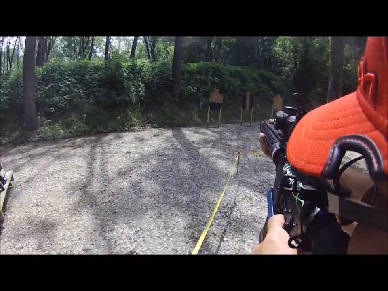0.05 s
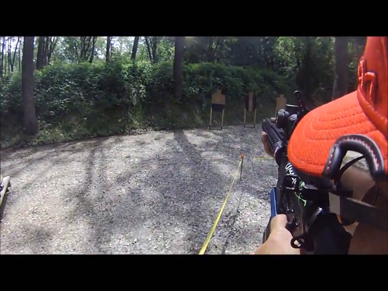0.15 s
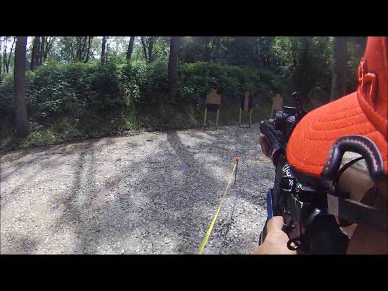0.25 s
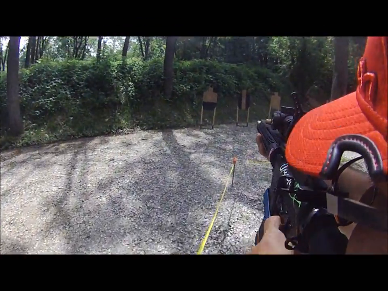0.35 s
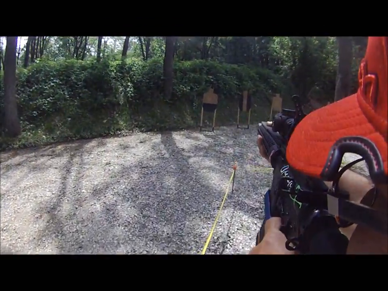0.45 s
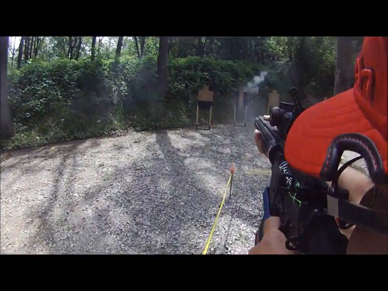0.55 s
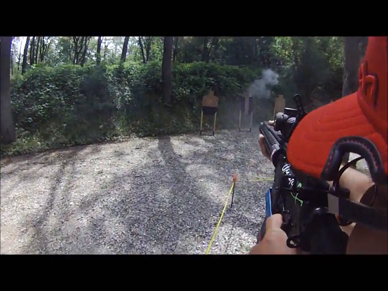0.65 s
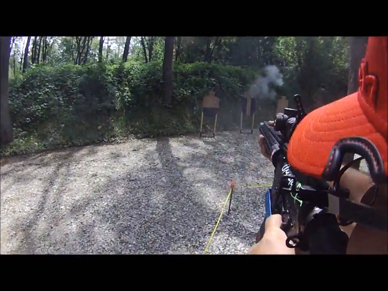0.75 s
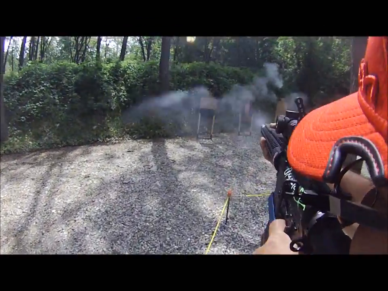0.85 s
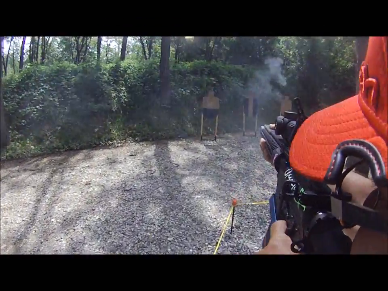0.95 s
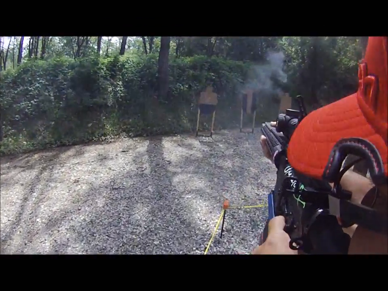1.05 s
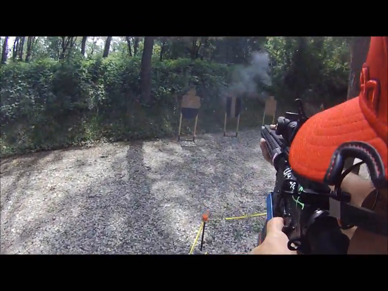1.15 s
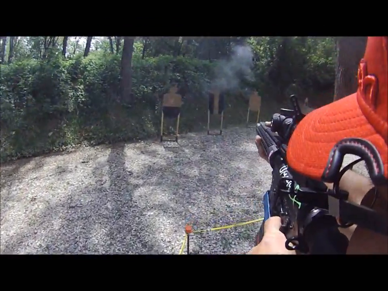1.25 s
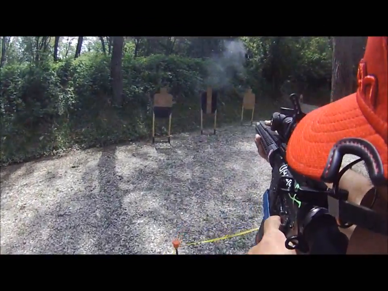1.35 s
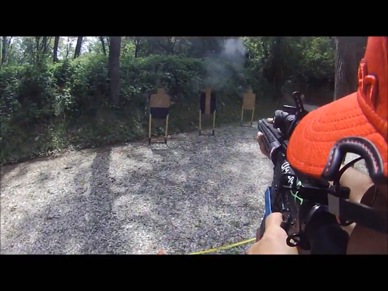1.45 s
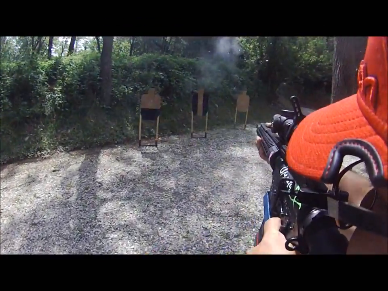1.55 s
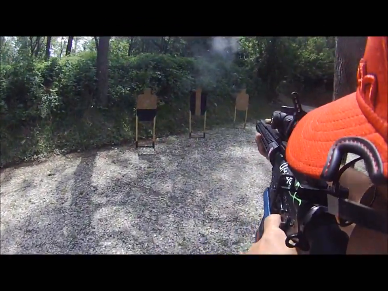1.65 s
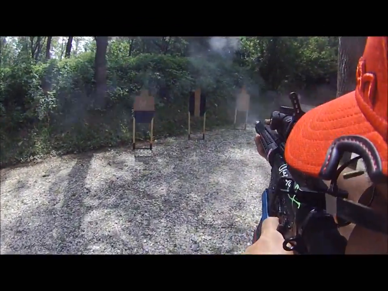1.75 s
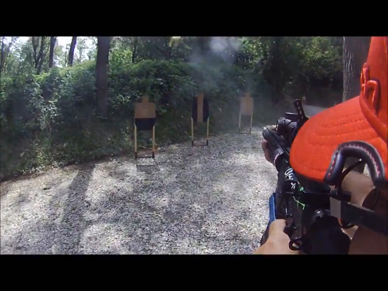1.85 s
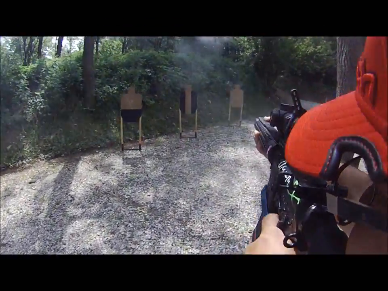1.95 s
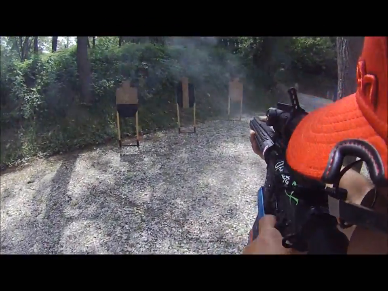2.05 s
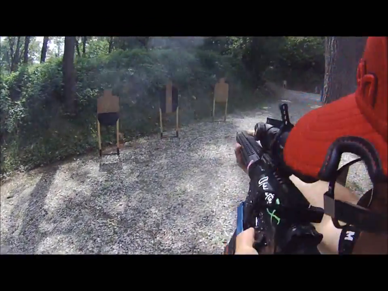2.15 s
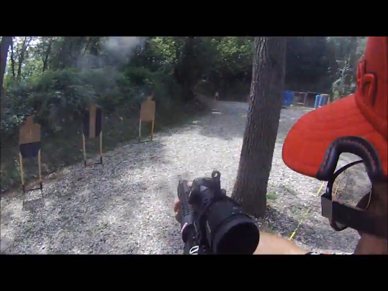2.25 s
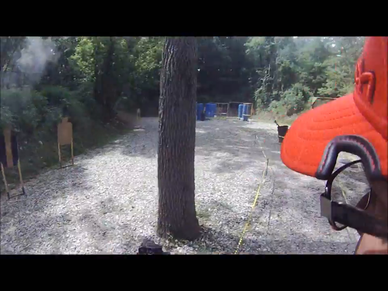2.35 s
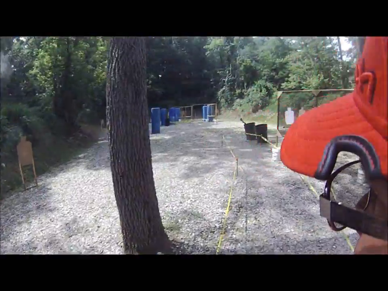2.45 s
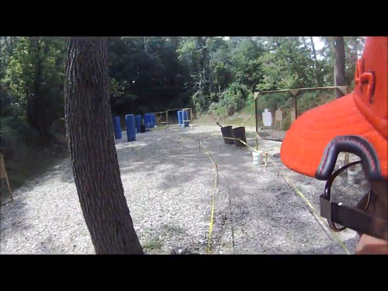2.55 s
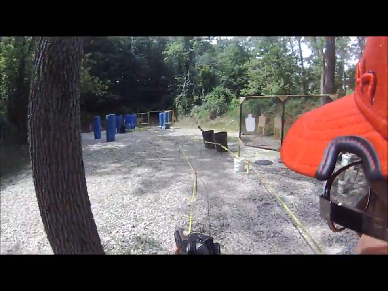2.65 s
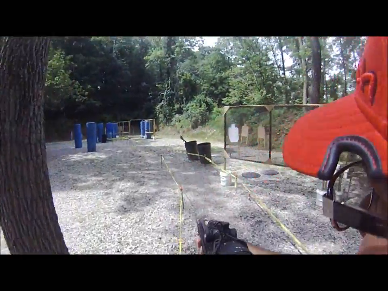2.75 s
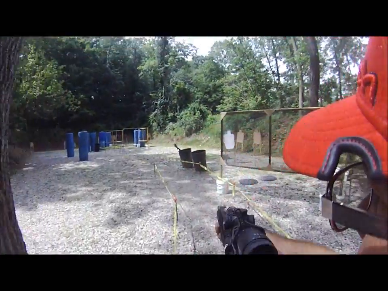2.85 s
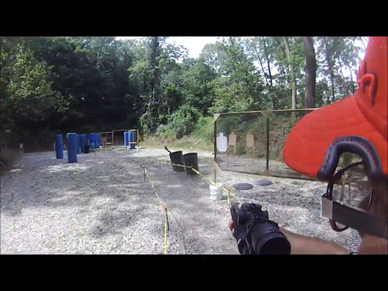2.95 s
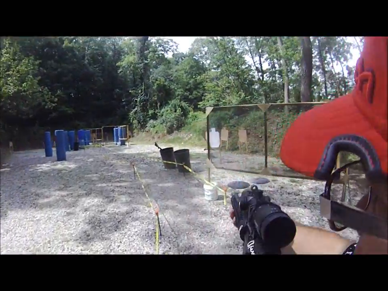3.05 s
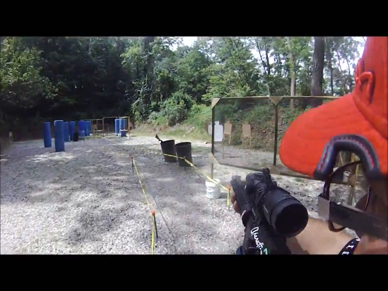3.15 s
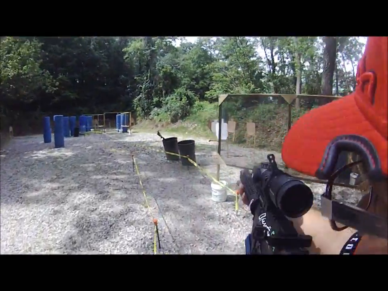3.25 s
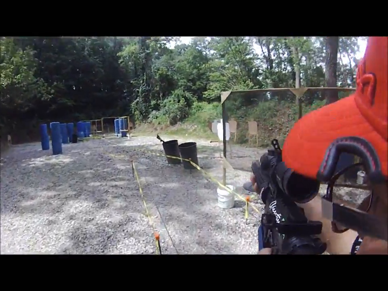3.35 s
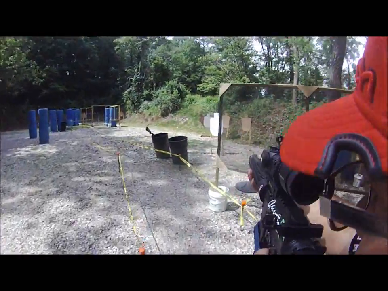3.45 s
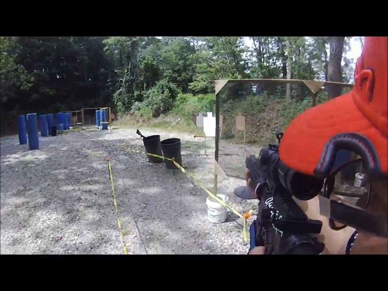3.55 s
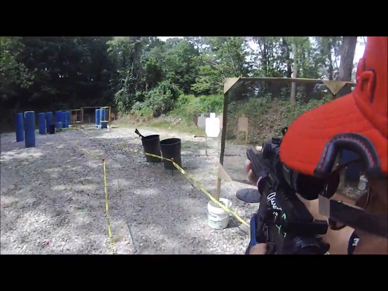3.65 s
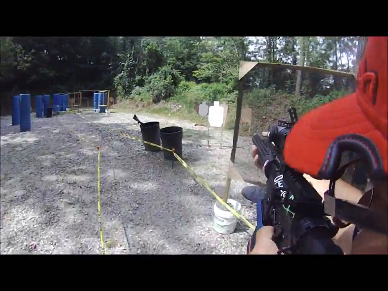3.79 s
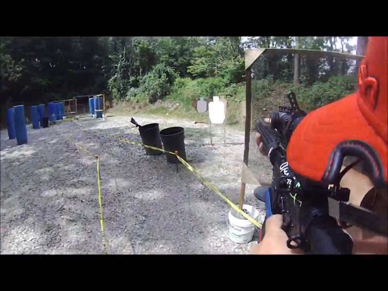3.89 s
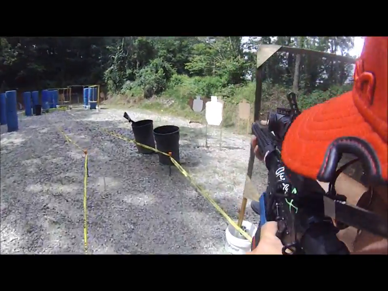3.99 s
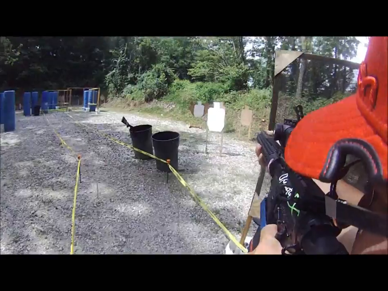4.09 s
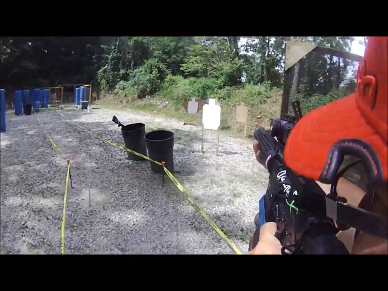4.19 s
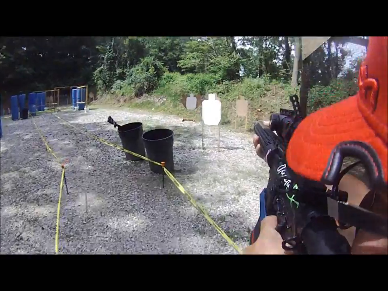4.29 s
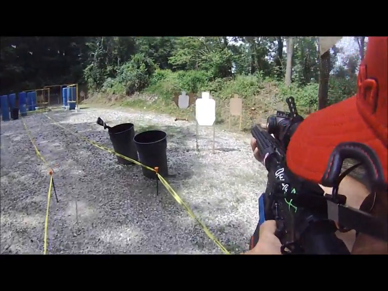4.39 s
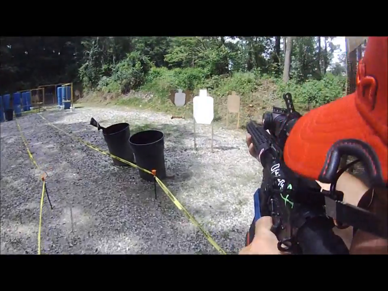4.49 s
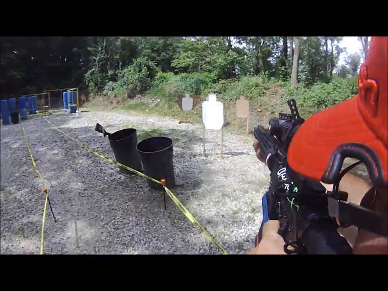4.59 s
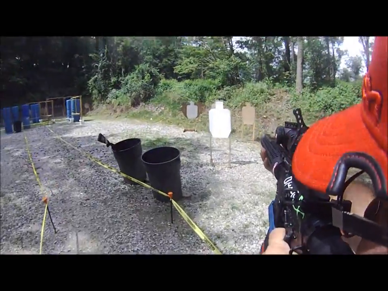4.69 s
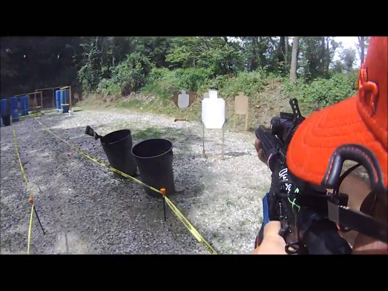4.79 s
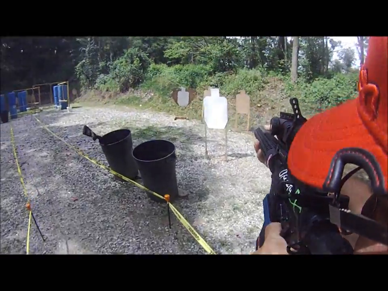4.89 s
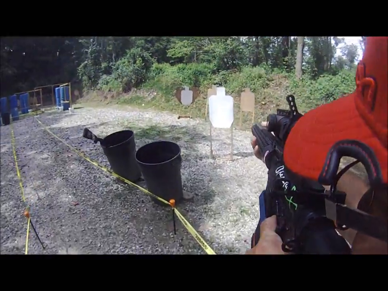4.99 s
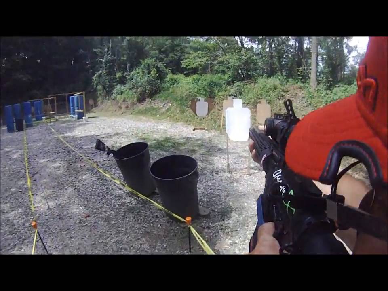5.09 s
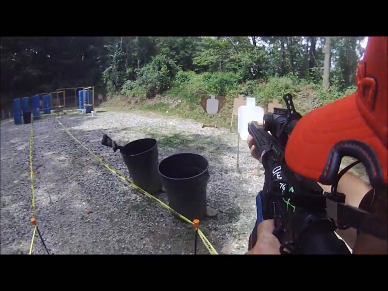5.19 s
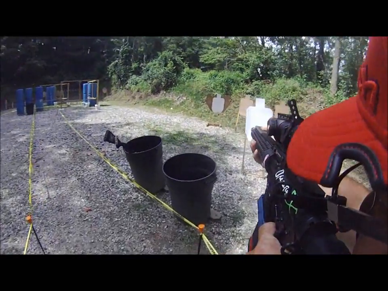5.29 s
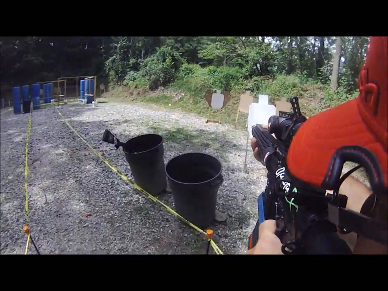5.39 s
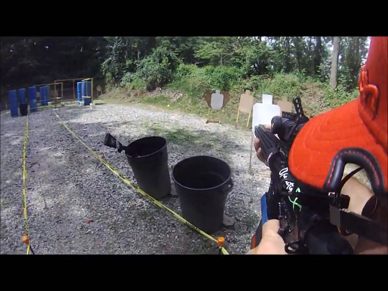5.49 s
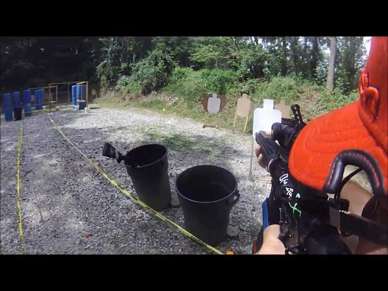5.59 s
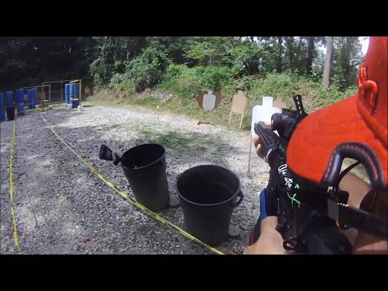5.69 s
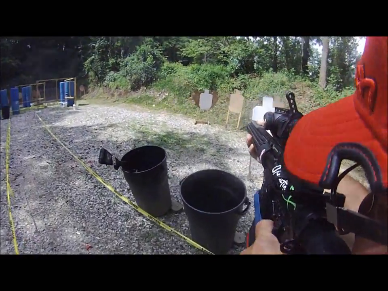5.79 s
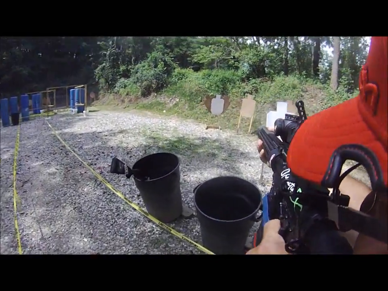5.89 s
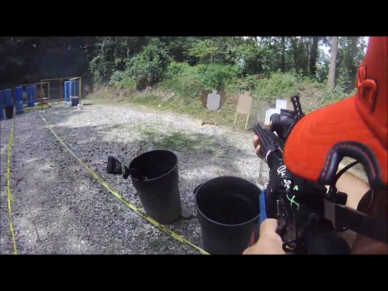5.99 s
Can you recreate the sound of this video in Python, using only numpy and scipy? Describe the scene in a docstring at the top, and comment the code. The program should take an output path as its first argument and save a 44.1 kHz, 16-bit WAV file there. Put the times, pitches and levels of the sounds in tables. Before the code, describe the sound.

Very quiet outdoor air opens, with a soft clothing rustle and a thin, rising squeak around 0.3 s. At 0.5 and 0.87 s two close rifle shots explode: swinging, boxy booms with ragged cracks, overloading a head-worn camera's microphone, nearly mono. The bolt slams just after each shot; a short slap returns from the bank and a low-mid tail rolls through the trees. A faint rattle at 1.6 s leads to a tighter pair at 1.74 and 1.99 s. As the echoes fade, hurried gravel steps crunch from 3.0 to 4.5 s, with dull rumbling, a strong case bump at 3.3 s, small sling ticks, a metallic clink at 4.0 s and a sharp click at 4.3 s. Another rapid pair hits at 4.6 and 4.83 s, its tail decaying, then the last at 5.74 and 5.96 s, ending abruptly in the final blast.

```python
"""Faint outdoor air, a rustle of clothes and a thin squeak lead into four fast pairs of rifle shots on a gravel range.
Each blast is a swinging boom with a ragged crack; it overloads the microphone of a head-worn camera in a boomy case,
slaps back from the berm and rolls away through the trees as noise that lasts longest in the low mids.
Between pairs the shooter moves on: gravel grains and stones crunch, the sling rattles in random ticks,
a metal part clinks in damped modes and bumps on the camera case swing briefly."""
import sys
import numpy as np
from scipy import signal
from scipy.fft import rfft, irfft, next_fast_len
from scipy.io import wavfile
from scipy.ndimage import map_coordinates

SR = 44100
rng = np.random.default_rng(int(sys.argv[2]) if len(sys.argv) > 2 else 0)


def inscribe(sig):
    """Save sig as 16-bit PCM at rate SR to the path in sys.argv[1].

    A 1-D sig is mono; a 2-D sig holds one channel per row.
    Samples are clipped to [-1, 1] before scaling.
    """
    pcm = np.round(np.clip(np.atleast_2d(sig).T, -1, 1) * 32767)
    wavfile.write(sys.argv[1], SR, pcm.astype(np.int16))


N = 265923
TIME = np.arange(N) / SR

# In every spectrum table the level is a relative power density, per Hz.
# Shots: [t/s, relative level/dB, time the boom holds/s, time until the bolt slams home/s,
# relative bolt level/dB]
SHOTS = [(0.504, 5, 0.048, 0.038, -17), (0.869, 5, 0.045, 0.03, -12), (1.7425, 5, 0.049, 0.031, -14),
         (1.991, 4.5, 0.048, 0.03, -18), (4.598, 5.5, 0.03, 0.053, -16.5),
         (4.8261, 5.5, 0.028, 0.044, -15.5), (5.742, 5, 0.036, 0.04, -29), (5.961, 4.5, 0.041, 0.047, -30)]
# Spectrum of the blast's crack and of the bolt: [f/Hz, level/dB]
CRACK_SPECTRUM = [(400, -18), (1200, -3.5), (2200, 2.5), (4000, -0.5), (6000, -6), (9000, -10),
                  (15000, -18)]
# Spectrum of a hard, sharp contact and of fine grit: [f/Hz, level/dB]
CLICK_SPECTRUM = [(200, -7.5), (900, 15), (1600, -3), (3000, 0), (7000, 2), (11000, -5), (15000, -21)]
# Spectrum of a tap on the camera case: [f/Hz, level/dB]
CASE_SPECTRUM = [(300, -17), (800, 14), (1100, -4.5), (1500, 9.5), (1800, -4), (2300, 0), (2700, -7),
                 (3100, -19), (4200, -9), (8000, -25.5), (15000, -31)]


def amp(db):
    """Level in decibels to amplitude ratio."""
    return 10 ** (np.asarray(db) / 20)


def unit(x):
    """Normalization to an rms of 1."""
    return x / np.sqrt(np.mean(x ** 2) + 1e-20)


def along(points, hz):
    """Interpolation of (f/Hz, value) points on a logarithmic frequency axis."""
    f, v = np.transpose(points)
    return np.interp(np.log(hz + 1), np.log(f + 1), v)


def add(track, s, sound):
    """Superposition: a sound adds to the track from time s."""
    part = track[round(s * SR):][:len(sound)]
    part += sound[:len(part)]


def colour(x, spectrum, size=8192):
    """Minimum-phase filter: a folded cepstrum makes the response causal; white noise keeps its power."""
    hz = np.fft.rfftfreq(size, 1 / SR)
    cepstrum = irfft(np.log(amp(along(spectrum, hz))))
    cepstrum[1:size // 2] *= 2
    cepstrum[size // 2 + 1:] = 0
    response = irfft(np.exp(rfft(cepstrum)))
    response /= np.linalg.norm(response)
    return signal.fftconvolve(x, response)[:len(x)]


def noise(spectrum, size=N):
    """Stationary coloured noise of rms 1, taken after the filter has settled."""
    settling = SR // 10
    white = rng.standard_normal(size + settling)
    return unit(colour(white, spectrum)[settling:])


def wobble(rate, size=N):
    """Band-limited random modulation: a smooth curve through `rate` random knots a second."""
    knots = rng.standard_normal(int(size * rate / SR) + 4)
    return map_coordinates(knots, [np.arange(size) * rate / SR])


def burst(t60, size=SR // 4):
    """Exponential decay: white noise starts at once and falls 60 dB in t60 seconds."""
    return rng.standard_normal(size) * amp(-60 * TIME[:size] / t60)


def ticks(rows, spectrum, t60, gain_db):
    """Impulsive excitation: short hard contacts (t/s, level/dB) share one spectrum."""
    out = np.zeros(N)
    for s, db in rows:
        add(out, s, amp(db + gain_db) * burst(t60))
    return colour(out, spectrum)


def swell(length):
    """Force pulse: a push peaks at half the length (s) and eases off."""
    u = TIME[:SR // 2] / (length / 2)
    return u * np.exp(1 - u)


def high_pass(x, hz):
    """Low-frequency cutoff: the small case passes little deep bass."""
    return signal.sosfilt(signal.butter(2, hz, "high", fs=SR, output="sos"), x)


def outdoor_air():
    """Broadband ambient noise: its level drifts slowly at random."""
    # Spectrum of the air: [f/Hz, level/dB]
    air_spectrum = [(25, -31.5), (120, -16), (250, -7), (450, 2.5), (800, -6), (1300, -16), (1800, -25.5),
                    (3000, -29.5), (6000, -39), (10000, -47), (15000, -56.5)]
    drift = amp(wobble(4))
    return amp(-48) * drift * noise(air_spectrum)


def moving():
    """Friction noise: clothes and straps rustle dully through the case as each move builds and settles."""
    # Moves of the body: [start t/s, length/s, relative rustle level/dB, relative rumble level/dB]
    body_moves = [(0.226, 0.31, -35, -42.5), (2.988, 0.17, -41.5, -40), (3.287, 0.14, -49.5, -38),
                  (3.557, 0.032, -45, -40), (3.834, 0.054, -47.5, -35), (3.976, 0.25, -48.5, -42),
                  (4.41, 0.029, -49.5, -45.5)]
    # Spectrum of the rustle: [f/Hz, level/dB]
    rustle_spectrum = [(120, -40.5), (200, -9.5), (570, 0.5), (748, -6), (833, -10), (1220, -17.5),
                       (1810, -34), (2550, -32), (3010, -37.5), (3410, -39.5), (4470, -41.5),
                       (15000, -57.5)]
    # Spectrum of the rumble: [f/Hz, level/dB]
    rumble_spectrum = [(20, -8.5), (60, -2.5), (130, 4.5), (230, 3), (330, 5), (420, -7.5), (600, -46.5)]
    rise_db_per_s, fall_db_per_s = 84.5, 128  # of the rustle
    rustle, rumble = np.zeros(N), np.zeros(N)
    for s, length, rustle_db, rumble_db in body_moves:
        rise_db = rise_db_per_s * (TIME - s)
        fall_db = fall_db_per_s * (s + length - TIME)
        effort_db = np.minimum(0, np.minimum(rise_db, fall_db))
        rustle = np.maximum(rustle, amp(rustle_db + effort_db))
        rumble = np.maximum(rumble, amp(rumble_db + 0.74 * effort_db))  # rumble follows less steeply
    folds = amp(1.2 * wobble(35))
    rustling = amp(1.5) * rustle * noise(rustle_spectrum)
    rumbling = amp(-2) * rumble * noise(rumble_spectrum)
    return folds * (rustling + rumbling)


def squeak():
    """Frequency modulation: a thin tone rises a little and wavers; its phase is the integral of its pitch."""
    # Faint high squeaks: [t/s, length/s, starting f/Hz, level/dB]
    squeak_events = [(0.298, 0.09, 3330, -57)]
    rise_hz_per_s, waver_hz = 2000, 55
    out = np.zeros(N)
    for s, length, hz, db in squeak_events:
        t = TIME[:round(length * SR)]
        pitch = hz + rise_hz_per_s * t + waver_hz * wobble(200, len(t))
        tone = np.sin(2 * np.pi * np.cumsum(pitch) / SR)
        envelope = np.sin(np.pi * t / t[-1])
        add(out, s, amp(db) * envelope * tone)
    return out


def action():
    """Impact noise: the action snaps ahead of a pair, and the bolt slams home after every shot."""
    # Snaps just ahead of the first shot of each pair: [t/s, relative level/dB]
    snap_events = [(0.4963, -1.5), (1.734, -14), (4.5897, -7.5), (5.7333, -17.5)]
    # Spectrum of a snap: [f/Hz, level/dB]
    snap_spectrum = [(100, -8), (350, 13), (800, -6.5), (1600, -9), (3000, -11), (3900, 4.5), (4800, -13),
                     (9000, -19.5), (15000, -37)]
    bolts = [(s + cycle, bolt_db) for s, _, _, cycle, bolt_db in SHOTS]
    snapping = ticks(snap_events, snap_spectrum, t60=0.0026, gain_db=4)
    slamming = ticks(bolts, CRACK_SPECTRUM, t60=0.02, gain_db=-2)
    return snapping + slamming


def boom_swing(size, evenness):
    """Envelope compression: the case's boom swings with wandering pitch and fairly even strength."""
    # Spectrum of the boom: [f/Hz, level/dB]
    boom_spectrum = [(25, -24), (85, -24), (170, -15.5), (300, -5.5), (420, -2), (495, 2.5), (585, -0.5),
                     (670, 0.5), (900, -7.5), (1130, -9.5), (1700, -26), (4000, -60)]
    z = signal.hilbert(noise(boom_spectrum, size))
    return unit(z.real / np.abs(z) ** evenness)


def blasts():
    """Multipath propagation: the powers of the paths add to shape each blast's boom and ragged crack."""
    # Near paths (direct, ground, trunks):
    # [delay t/s, relative boom level/dB, relative crack level/dB, t60/s]
    near_paths = [(0, 5.5, -2, 0.052), (.007, 1.5, -7, 0.057), (0.015, -3.5, -17.5, .25)]
    berm_s, berm_boom_db, berm_crack_db = 0.0695, -20, -27  # delay and relative levels of the slap
    cutoff_s = 0.01  # time in which the near echoes run out
    crack_over_boom_db = -1.5
    out, t = np.zeros(N), TIME[:SR // 3]
    slap = t / 0.0011 * np.exp(1 - t / 0.0021)  # the sloping berm smears its echo
    for s, db, hold, _, _ in SHOTS:
        boom_power, crack_power = np.zeros(len(t)), np.zeros(len(t))
        for delay, boom_db, crack_db, t60 in near_paths:
            fade = amp(-60 * t / t60)
            add(boom_power, delay, (amp(boom_db) * fade) ** 2)
            add(crack_power, delay, (amp(crack_db) * fade) ** 2)
        ending = amp(-14 * np.clip((t - hold) / cutoff_s, 0, 1))  # the near echoes run out
        boom_power *= ending
        crack_power *= ending
        add(boom_power, berm_s, (amp(berm_boom_db) * slap) ** 2)
        add(crack_power, berm_s, (amp(berm_crack_db) * slap) ** 2)
        boom_onset = 1 - np.exp(-t / 0.0011)
        boom = np.sqrt(boom_power) * boom_onset * boom_swing(len(t), evenness=0.45)
        ragged = unit(amp(4.2 * wobble(700, len(t))))  # shock fronts come in clumps
        crack_onset = 1 - np.exp(-t / 0.00093)
        fronts = np.sqrt(crack_power) * crack_onset * ragged * rng.standard_normal(len(t))
        crack = colour(fronts, CRACK_SPECTRUM)
        add(out, s, amp(db - 9.5) * (boom + amp(crack_over_boom_db) * crack))
    return high_pass(high_pass(out, hz=125), hz=95)


def forest():
    """Reverberation: trees scatter shots into a tail longest in the low mids; deep bass and treble die sooner."""
    # Spectrum of the tail before it decays: [f/Hz, level/dB]
    forest_spectrum = [(30, -28), (100, -4.5), (240, 2), (550, -1), (800, -6.5), (1150, -11), (1700, -23.5),
                       (3000, -21), (6000, -24.5), (10000, -32.5), (15000, -40.5)]
    # Reverberation time of the trees: [f/Hz, t60/s]
    forest_decay = [(100, 0.29), (250, 0.68), (550, 1.465), (1100, 1.176), (3000, 1.046), (7000, 0.85),
                    (14000, 0.5)]
    tail_db = -26  # against the shot's level
    out, t = np.zeros(N), TIME[:3 * SR // 2]
    for s, db, *_ in SHOTS:
        hz, age, z = signal.stft(noise(forest_spectrum, len(t)), SR, nperseg=512)
        decay = amp(-60 * age / along(forest_decay, hz)[:, None])
        tail = signal.istft(z * decay, SR, nperseg=512)[1][:len(t)]
        treble = high_pass(tail, hz=1500)
        trunks = amp(2.3 * wobble(45, len(t)))  # single low echoes
        leaves = amp(0.71 * wobble(70, len(t)))  # a more even hiss
        echoes = (tail - treble) * trunks + treble * leaves
        onset = 1 - np.exp(-t / 0.032)
        add(out, s, amp(db + tail_db) * echoes * onset)
    return out


def sling():
    """Random impacts: the sling rattles in small scattered ticks, and the gear gives single sharp clicks."""
    # Light rattles: [t/s, length/s, relative level of a tick/dB]
    rattle_events = [(1.611, 0.092, -45), (3.35, 0.07, -46), (4.198, 0.32, -50)]
    # Sharp clicks of the gear: [t/s, relative level/dB, relative level of the knock through the case/dB]
    click_events = [(3.969, -23, -30), (4.2836, -16.5, -48)]
    ticks_per_s, scatter_db = 70, 2
    sharp = [(s, db) for s, db, _ in click_events]
    through_case = [(s, case_db) for s, _, case_db in click_events]
    small = []
    for s, length, db in rattle_events:
        for _ in range(round(length * ticks_per_s)):
            small.append((s + length * rng.random(), db + scatter_db * rng.standard_normal()))
    contacts = ticks(sharp + small, CLICK_SPECTRUM, t60=0.009, gain_db=-6.5)
    return contacts + ticks(through_case, CASE_SPECTRUM, t60=0.02, gain_db=-3)


def steps():
    """Granular contact: each step grinds gravel and slips stones, then weight thuds up through the body."""
    # Steps: [t/s, relative scuff level/dB, thud level/dB, scuff length/s]
    footfalls = [(3.029, -43, -42, 0.056), (3.264, -41, -35, 0.036), (3.531, -42.5, -39, 0.036),
                 (3.821, -41, -45, 0.039), (4.21, -42, -45, 0.062), (4.433, -45.5, -57, 0.017)]
    # Spectrum of the crunch: [f/Hz, level/dB]
    gravel_spectrum = [(300, 9), (800, 19), (1700, -3.5), (4000, -8), (8000, -23.5), (15000, -35)]
    # Spectrum of the thud: [f/Hz, level/dB]
    thud_spectrum = [(15, -10), (35, 26), (90, 19), (220, 3), (400, -9.5), (800, -33)]
    weight_lag_s, thud_s = 0.072, 0.022  # the weight lands after the sole first scuffs; thud length
    stones_per_s, stones_db, stone_scatter_db = 170, 1, 3.5  # single stones slip under the sole
    grit_db = -21  # fine grit among the stones, against the scuff
    grind, weight = np.zeros(N), np.zeros(N)
    for s, scuff_db, thud_db, length in footfalls:
        add(grind, s, amp(scuff_db) * swell(length))
        add(weight, s + weight_lag_s, amp(thud_db) * swell(thud_s))
    grains = unit(amp(6 * wobble(360)) * rng.standard_normal(N))
    slips = rng.random(N) < stones_per_s / SR
    stone_sizes = amp(stone_scatter_db * rng.uniform(-0.87, 1, N))
    stones = unit(slips * stone_sizes * rng.choice([-1, 1], N))
    crunch = colour(grind * (amp(-7) * grains + amp(stones_db) * stones), gravel_spectrum)
    grit = amp(grit_db) * colour(grind * grains, CLICK_SPECTRUM)
    return crunch + grit + weight * noise(thud_spectrum)


def knocks():
    """Heavily damped oscillation: a bump on the case is one swing with a tick."""
    # Knocks on the camera case: [t/s, relative level/dB, f/Hz, tick level against the swing/dB]
    case_knocks = [(3.3212, 0, 302, -4.5), (3.3454, -14.5, 268, -14), (3.39, -26, 170, -22),
                   (3.862, -18, 367, -26), (3.938, -21.5, 300, -20), (4.2303, -17.5, 664, -25),
                   (4.247, -23.5, 770, -14), (4.3946, -14, 497, -19.5), (4.535, -14, 540, -19)]
    out, t = np.zeros(N), TIME[:SR // 4]
    for s, db, hz, tick_db in case_knocks:
        age = hz * t / 0.3  # the swing peaks within its first half cycle
        push = -np.sin(2 * np.pi * hz * t) * age * np.exp(1 - age)
        tick = colour(burst(0.014), CASE_SPECTRUM)
        add(out, s, amp(db) * (push + amp(tick_db) * tick))
    return out


def clink():
    """Modal vibration: a struck metal part clanks; unsteady modes stand out of its dense, short ring."""
    # Clinks: [t/s, relative level/dB]
    clink_events = [(4, -16)]
    # Modes of the metal part: [f/Hz, relative level/dB, t60/s]
    metal_modes = [(690, 0, .2), (1165, -3, .4), (1880, -14, .2), (2510, -18, .2), (3180, -23, .25),
                   (5030, -28, .22), (5910, -28, .25), (6815, -28, .3), (8263, -24, .18), (8888, -25, .2),
                   (9250, -20, .2), (10150, -26, .25), (10930, -28, .22), (11790, -24, .2),
                   (13000, -26, .2), (14150, -22, .15)]
    # Spectrum of the dense ring: [f/Hz, level/dB]
    clank_spectrum = [(250, -29), (450, 2.5), (750, 3.5), (1200, -2.5), (2500, -12.5), (4000, -17.5),
                      (10000, -30.5), (15000, -41)]
    out, t = np.zeros(N), TIME[:SR // 2]
    for s, db in clink_events:
        for hz, mode_db, t60 in metal_modes:
            cycles = hz * t + rng.random() + 0.14 * wobble(124, len(t))
            decay = amp(db - 17 + mode_db - 60 * t / t60)
            add(out, s, decay * np.sin(2 * np.pi * cycles))
        strike = colour(burst(0.016), CLICK_SPECTRUM)
        ring = colour(burst(0.05) + amp(-15) * burst(0.31), clank_spectrum)
        add(out, s, amp(db - 2.5) * (ring + amp(-15) * strike))
    return out


def scene():
    """Superposition: all sources add almost in mono; a faint delayed copy of opposite sign sets the width."""
    width_db, width_s = -46.5, 0.0007  # level and lag of the copy added left and subtracted right
    gear = squeak() + sling() + high_pass(knocks(), hz=107) + clink()
    mono = outdoor_air() + moving() + action() + blasts() + forest() + steps() + gear
    side = amp(width_db) * np.interp(TIME - width_s, TIME, mono)
    return np.array([mono + side, mono - side])


def record(dry):
    """Saturation and band limiting: blasts flatten against the microphone's ceiling, then the top is cut."""
    top_hz = 15500  # the gain has halved here, and falls very steeply above
    clipped = dry / (1 + np.abs(dry) ** 8) ** (1 / 8)
    size = next_fast_len(N + SR // 2)
    passband = 1 / (1 + (np.fft.rfftfreq(size, 1 / SR) / top_hz) ** 100)
    return irfft(rfft(clipped, size) * passband, size)[:, :N]


dry = scene()
out = record(dry)
inscribe(out)
```